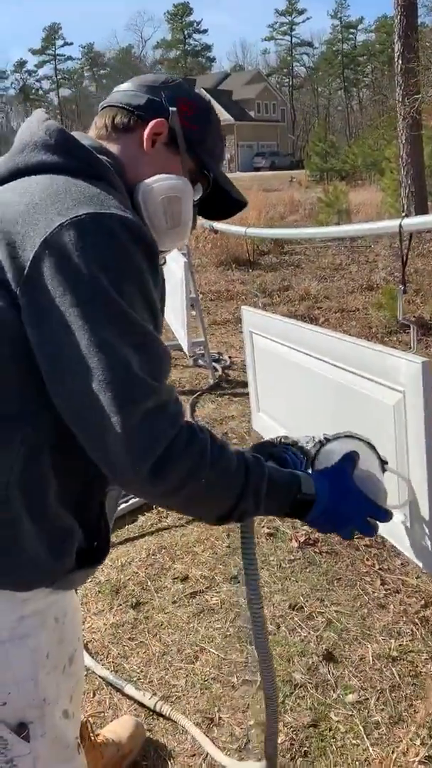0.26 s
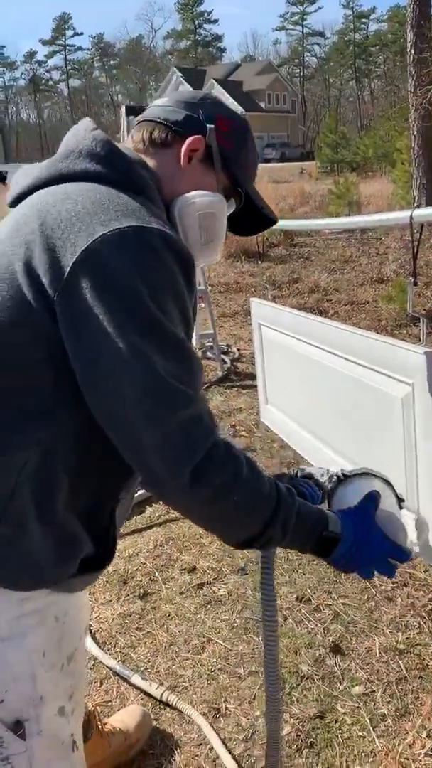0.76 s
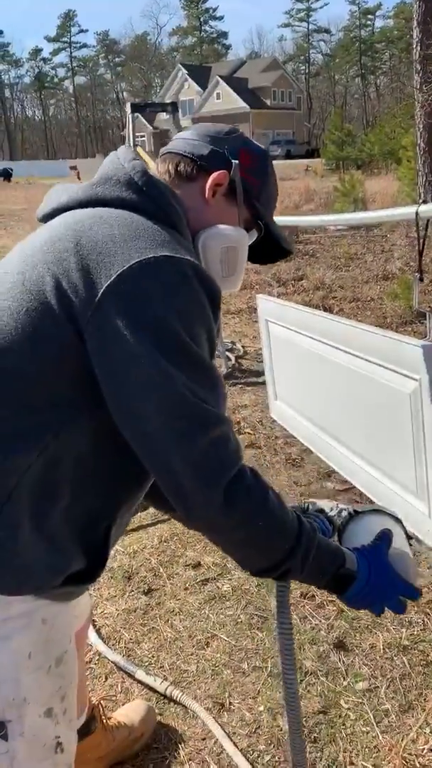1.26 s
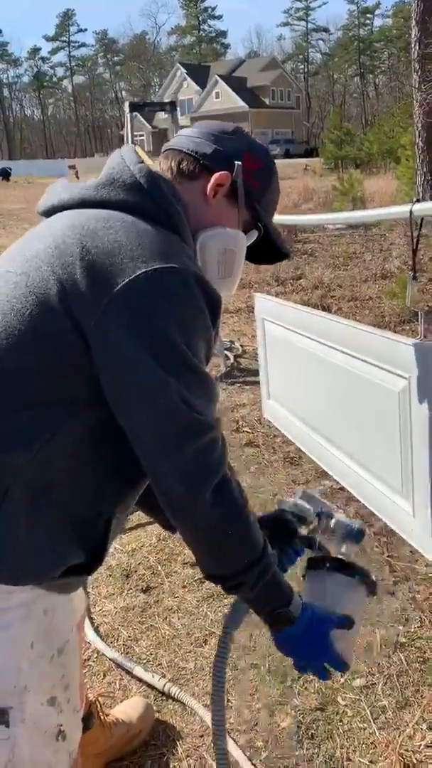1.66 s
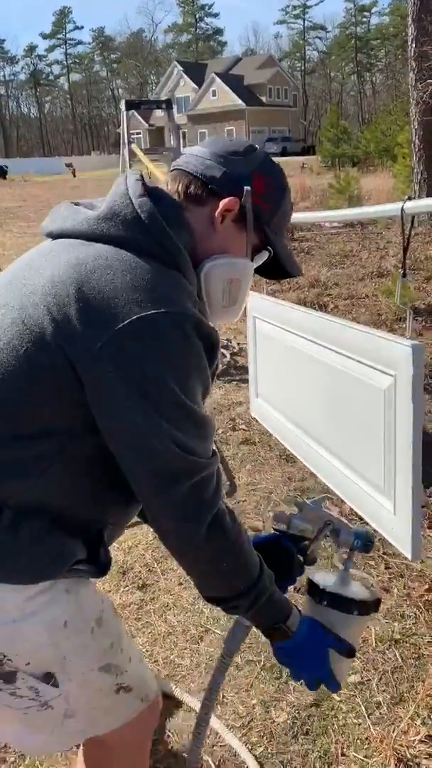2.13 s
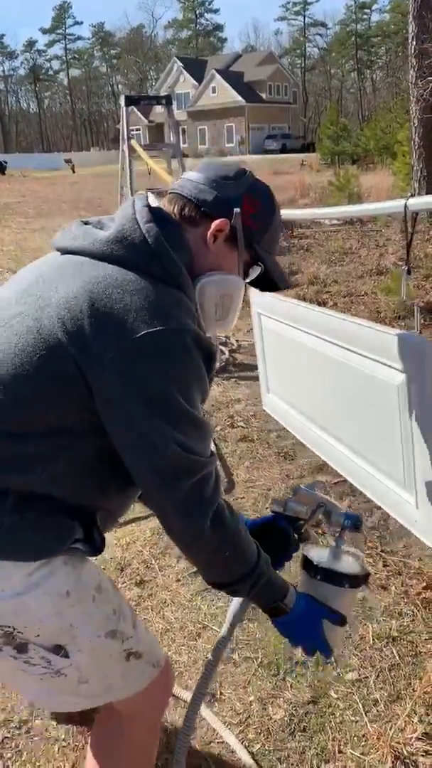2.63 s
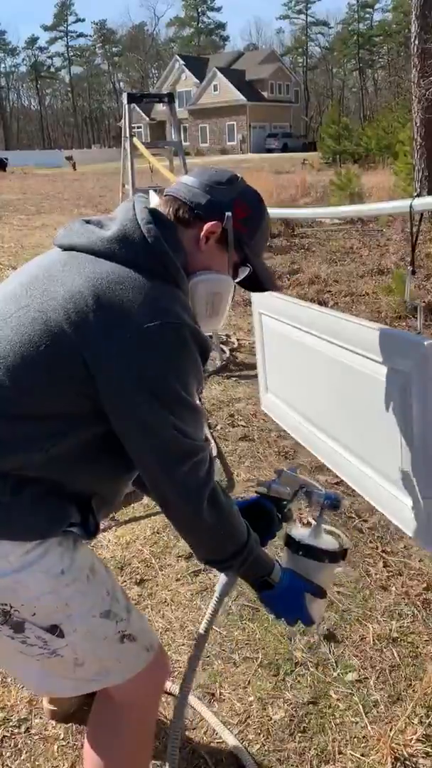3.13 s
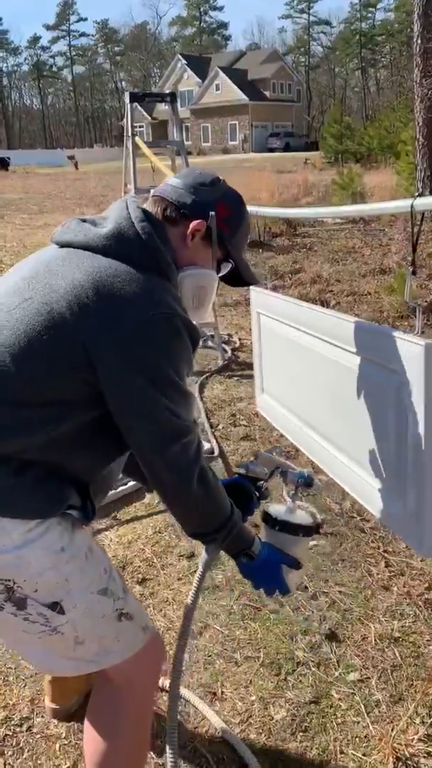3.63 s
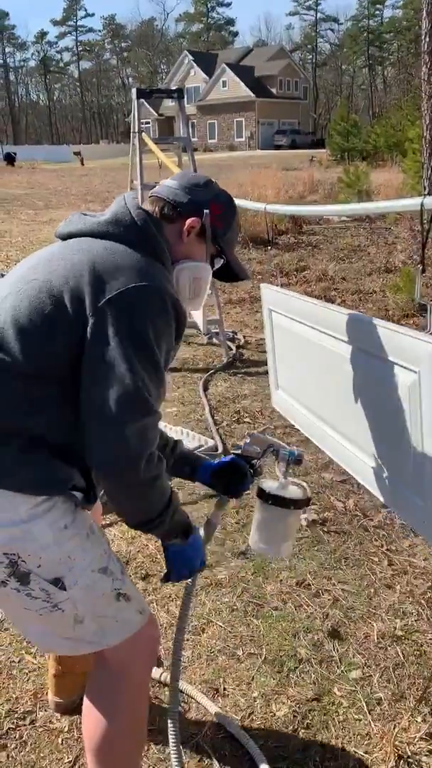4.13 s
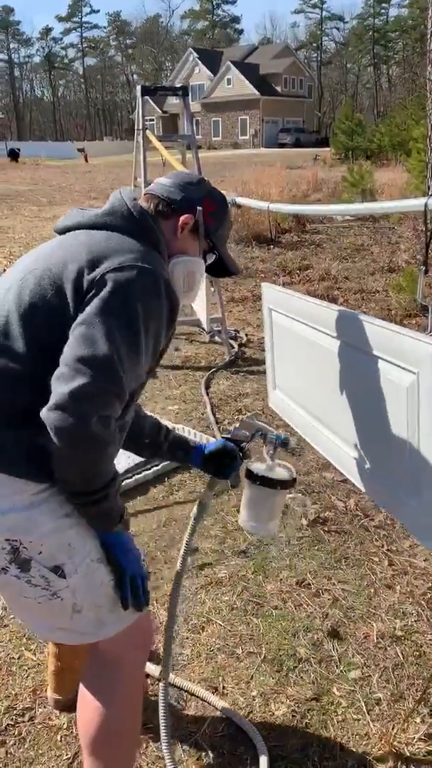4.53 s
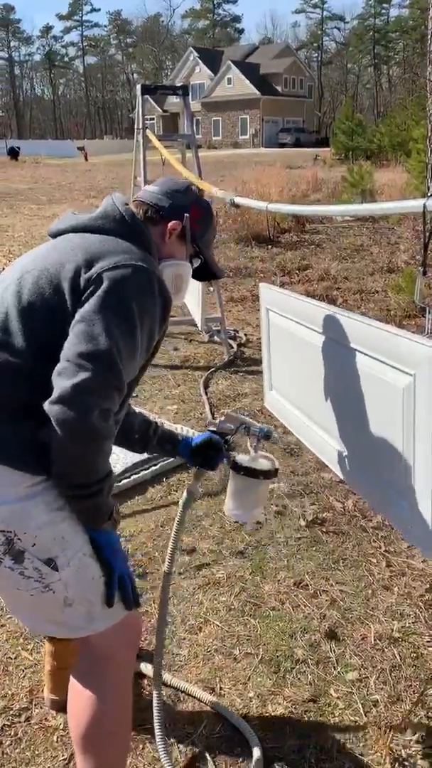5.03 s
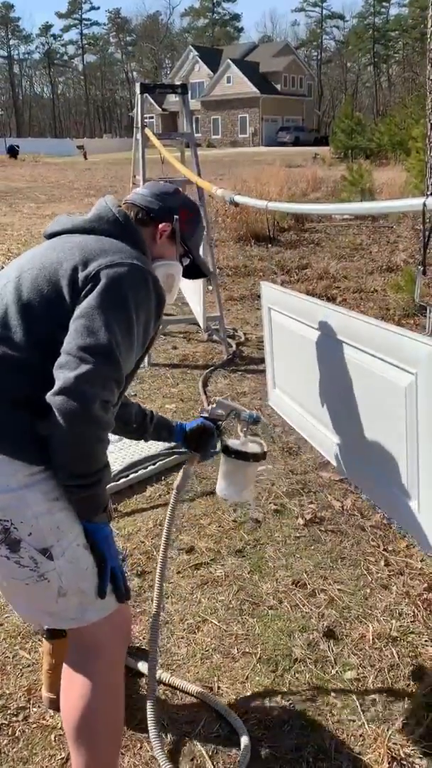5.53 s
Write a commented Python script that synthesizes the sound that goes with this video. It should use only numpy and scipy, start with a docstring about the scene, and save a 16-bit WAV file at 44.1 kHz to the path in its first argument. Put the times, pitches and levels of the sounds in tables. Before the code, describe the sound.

A hand-held stereo recorder close to a turbine paint sprayer in an open yard, with no noticeable echo. From 0 s a loud, bright, treble-heavy hiss streams from the gun near a door panel, softening by several decibels as the gun swings away. Beneath it runs a smooth whine near 350 Hz, with a rush of air, a faint motor hum and a thin singing hose. Dull whooshes pass at about 1.2 and 1.4 s. At 1.47 s the trigger is released: the hiss snaps off to a faint leak, and the whine glides up towards 370 Hz with brighter rushing air. At 2.1 s the hiss bursts back, with short clean hose notes until 2.4 s and a low whoosh. The whine slowly sinks back and is stronger from about 3 s. The hiss holds until 5.8 s, its resonances sliding gently. Soft low bumps recur, notably near 2.5 and 4.7 s.

```python
"""Turbine paint sprayer in a yard

A hand-held recorder with two microphone ports hears a spray gun's hiss, shaped noise whose colour passes from
close to a door panel, through turned sideways, to held upright. The turbine whines on one note, a sine with
faint overtones over a rush of air; its motor hums and its hose sings. The trigger is let go once: the hiss
drops to a faint leak and the blocked turbine speeds up. Low rumble, soft bumps and dull whooshes lie beneath.
"""
import sys
import numpy as np
from scipy import signal
from scipy.fft import rfft, irfft, next_fast_len
from scipy.io import wavfile
from scipy.ndimage import uniform_filter1d

SR = 44100
rng = np.random.default_rng(int(sys.argv[2]) if len(sys.argv) > 2 else 0)


def digitize_waveform(pressure):
    """Quantize a signal to 16-bit integers and store it at the path in sys.argv[1].

    Rows of a 2-D input are taken as channels; values are limited to [-1, 1].
    """
    field = np.atleast_2d(pressure).T
    bounded = np.clip(field, -1, 1)
    quanta = np.round(bounded * 32767).astype(np.int16)
    wavfile.write(sys.argv[1], SR, quanta)


N = 254898
TIME = np.arange(N) / SR
SIZE = next_fast_len(N + 4096)  # padded transform length
FREQS = np.maximum(np.fft.rfftfreq(SIZE, 1 / SR), 1)  # kept off 0 Hz for the logarithm

# All colour tables give relative level; widths of peaks span the points where their dB falls to 1/e.

# Low rumble at the recorder. Each row: frequency in Hz, level in dB per Hz.
RUMBLE_COLOUR = [(15, -52), (25, -20), (35, -3), (50, -2.5), (70, 3.5), (100, -7.5), (150, -22),
                 (260, -6.5), (500, -73)]
# Its course, before the overall trim. Each row: time in seconds, level in dB.
RUMBLE_LEVEL = [(0, -52), (2.5, -45.5), (3.5, -50.5), (4.1, -73), (4.6, -61), (4.85, -39), (5.15, -57),
                (5.45, -43), (5.65, -65)]
# Soft bumps on the recorder. Each row: start in seconds, envelope peak in dB, pitch in Hz.
BUMPS = [(0.116, -36, 52), (0.701, -34, 55), (1.229, -31.5, 88), (1.38, -36, 75), (1.651, -35, 67),
         (2.164, -36, 59), (2.405, -37, 70), (2.487, -29, 108), (2.665, -32, 65), (3.109, -42, 72.2),
         (4.355, -35, 60), (4.705, -27, 72), (4.97, -34, 60), (5.29, -39, 57), (5.41, -42, 60)]
# Dull whooshes as the gun swings, before the trim. Each row: centre in seconds, half length in seconds, level in dB.
WHOOSHES = [(1.217, 0.055, -45.5), (1.415, 0.052, -43), (2.37, 0.17, -46.5)]
# Colour of the whooshes. Each row: frequency in Hz, level in dB per Hz.
WHOOSH_COLOUR = [(110, -25), (205, -0.5), (260, -7.5), (480, -6.5), (650, -12), (1500, -25), (6000, -70)]
# Clean notes of the hose as the air starts again. Each row: centre in seconds, level in dB.
HOSE_SWELLS = [(2.155, -42.5), (2.3, -45.5), (2.385, -43)]
# Rush of the turbine and leaking air. Each row: frequency in Hz, level in dB per Hz.
RUSH_COLOUR = [(160, -3.5), (230, -4.5), (480, 0.0), (700, -6.6), (1000, -8.6), (1600, -15.4),
               (2650, -15.2), (2950, -9.3), (4300, -9.0), (4800, -14.1), (5700, -10.2), (8700, -15.2),
               (12000, -19), (15600, -25)]
# Resonances of the turbine's housing. Each row: frequency in Hz, width in Hz, height in dB.
RUSH_PEAKS = [(1200, 140, 3), (2220, 200, 3), (2650, 150, -3), (2910, 110, 4.5), (3800, 250, 2),
              (4620, 150, -4), (5500, 350, 1.5), (6850, 300, 3), (7800, 400, -2), (8780, 150, 3.5)]
# Shaft tone at the moving recorder, before the trim. Each row: time in seconds, level in dB, left minus right in dB.
TONE = [(0, -38.5, -0.4), (1.22, -37.5, -0.4), (1.44, -36, -0.8), (1.7, -44.6, 0), (1.88, -40.2, 2),
        (1.98, -35.5, 3.5), (2.2, -32, 2.5), (2.35, -35.5, 2.5), (2.51, -39.2, 1), (2.85, -38.5, -0.5),
        (3.27, -33.5, -0.7), (3.7, -32.5, -1.4), (4.35, -33, -2.5), (5.77, -35, -0.8)]
# Overtones of the shaft, before trim and speed. Each row: multiple of the shaft speed, level in dB.
OVERTONES = [(2, -54), (6, -74), (8, -70), (12, -62), (19, -67), (24, -72)]

# Colour of the jet in each pose. Each row: frequency in Hz, level in dB per Hz.
AT_DOOR = [(200, -19.3), (480, -9.4), (640, -18.0), (1300, -14.0), (2100, -11.3), (2700, -13.7),
           (3800, -15), (5200, -8.2), (6500, -9), (7300, -9), (8800, -4.3), (11000, 0.0), (13000, -0.3),
           (15600, -1.2)]
SIDEWAYS = [(200, -13.7), (480, -7.6), (640, -13.9), (1300, -12.3), (2100, -8.8), (2700, -9.8), (3800, -11),
            (5200, -1.3), (6500, -1.0), (7300, -1.0), (8800, -0.6), (11000, 0.3), (13000, -2.2),
            (15600, -5.8)]
UPRIGHT = [(200, -13.7), (480, -7.7), (640, -13.8), (1300, -8.8), (2100, -7.0), (2700, -9.8), (3800, -11.5),
           (5200, -2.5), (6500, -3), (7300, -2.0), (8800, -0.3), (11000, -0.9), (13000, -0.6),
           (15600, -7.2)]
# Reflections off cup, hand and panel in each pose. Each row: frequency in Hz, width in Hz, height in dB.
AT_DOOR_PEAKS = [(940, 350, 5.3), (3650, 300, -2), (4280, 350, 3.8), (9350, 500, 1.5), (10200, 700, -0.8)]
SIDEWAYS_PEAKS = [(950, 300, 7.3), (2130, 450, 2.8), (3050, 500, 2.2), (3900, 250, -1), (4500, 450, 4.5),
                  (5980, 300, 2.6)]
UPRIGHT_PEAKS = [(950, 300, 3.0), (2130, 400, 2.2), (3800, 300, -1.5), (4270, 300, 2.8), (6800, 350, -2.5),
                 (9900, 900, -2.1), (13900, 900, -3.5)]
# Standing waves in the air path, alike in every pose. Each row: frequency in Hz, width in Hz, height in dB.
DUCT_PEAKS = [(383, 49, -11.5), (459, 29, 2.5), (487, 22, -12), (522, 37, 2), (553, 26, -10)]
# Aim of the gun; the lows spread while the treble beams. Each row: time in seconds, jet level in dB before the trim,
# pose (0 at the door, 1 sideways, 2 upright), extra level of the lows in dB.
AIM = [(0.05, -18.5, 0.027, -1.4), (0.25, -20.5, 0, 0), (0.48, -23, 0.028, 0), (0.72, -23.5, 0.1, 0.7),
       (0.95, -26, 0.27, 3.5), (1.24, -27, 0.28, 0.5), (1.44, -30.5, 0.55, 5), (2.12, -21.5, 1, -5),
       (2.24, -22, 1, -3), (2.62, -22.5, 1.044, -1.5), (2.9, -24.5, 1.08, 0), (3.3, -23.5, 1.14, 1),
       (3.65, -23, 1.3, -1), (3.95, -24, 1.57, -0.7), (4.65, -25.5, 1.95, 0.5), (5.15, -26, 1.86, 0.5),
       (5.77, -26, 2.27, 0)]
# Resonances between gun, cup and panel, gliding as the hand moves. Each row: time in seconds, pitch in Hz, height in dB.
LOW_RESONANCE = [(0, 5400, -11), (0.65, 5300, -4), (1.3, 5630, 6), (2.2, 5500, 2), (3.1, 5600, -3),
                 (4.1, 5200, 5), (4.5, 4860, 6), (4.9, 5050, 4), (5.4, 5020, 8), (5.77, 4920, 6)]
MAIN_RESONANCE = [(0, 5800, 4.4), (0.45, 5880, 12.7), (0.85, 6170, 3.9), (1.45, 6850, 4.8),
                  (2.15, 6800, 3.8), (3.0, 6720, 4.5), (3.8, 6430, 6.3), (4.25, 6290, 7.2),
                  (4.7, 6230, 6.3), (5.77, 6240, 4.9)]
HIGH_RESONANCE = [(4.1, 8100, -2), (4.45, 8050, 3), (4.75, 8600, 3.5), (5.0, 8480, 4.5), (5.25, 8000, 4.5),
                  (5.77, 8000, 2)]
# A reflection against the direct hiss, mostly a notch. Each row: time in seconds, frequency in Hz, height in dB.
NOTCH = [(0, 7140, -8), (0.4, 7240, -3), (0.8, 7650, 0), (1.2, 7700, 6), (2.3, 7750, -2), (3.2, 7440, -1.5),
         (3.9, 7360, -5), (4.5, 7650, -5), (4.9, 7740, -1), (5.77, 7500, -10)]

# Phase by which the left port leads; near 3-5 kHz the ports oppose. Each row: frequency in Hz, lead in radians.
PORT_PHASE = [(0, 0.2), (130, -0.1), (380, 0.2), (520, 1), (640, 2.5), (730, 3.8), (950, 5.4), (1450, 6.1),
              (1900, 6.45), (2350, 7.7), (2680, 9.38), (2900, 9.425), (5550, 9.425), (5950, 10.4),
              (7000, 11.4), (7500, 12.3), (9300, 12.7), (10500, 14), (11300, 15.2), (11800, 15.7),
              (13200, 15.72), (13700, 16.3), (14200, 17.1), (15000, 18.5), (16000, 18.9)]
# Likeness of the two ports. Each row: frequency in Hz, coherence from 0 to 1.
LIKENESS = [(50, 0.9), (350, 1), (580, 0.9), (720, 0.65), (950, 0.75), (1500, 1), (1900, 1), (2350, 0.76),
            (2800, 1), (5600, 1), (6600, .88), (8400, .97), (10400, .88), (11700, 1), (13300, 1),
            (14200, .9), (15400, .97)]
# Port balance. Each row: frequency in Hz, left minus right in dB.
BALANCE = [(60, 0.8), (600, 0), (820, 6), (1150, 0), (2400, -0.3), (2800, 0), (15000, 0)]
# Phase turn between the ports, one row per pose. Each row: band centre in Hz, width in Hz, whole turns,
# left minus right in dB in that band, scatter (negative: ports more alike), extra left lead in radians.
PORT_TURNS = [(4100, 1190, 1, 5.5, 0, 0.047), (4200, 500, 0, 0, -0.5, 0.22), (4187, 1100, 1, 7, 0, 0.1)]

# Band in which the pose shifts the left port's lead.
PORT_LEAD_HZ, PORT_LEAD_WIDTH_HZ = 3150, 900
# The trigger is let go once and pulled again; the air valve moves fast, down to a small leak.
RELEASE_S, PULL_S = 1.474, 2.09
VALVE_SHUT_DB_PER_S, VALVE_OPEN_DB_PER_S, VALVE_LEAK_DB = 1200, 740, -55
# Shaft speeds in turns per second; the turbine lags behind the hose pressure and settles exponentially.
FLOWING_HZ, BLOCKED_HZ, START_HZ = 352.0, 380.6, 355.4
HOSE_LAG_S, SETTLE_S = 0.058, 0.47
# The rush grows with shaft speed and shares part of the tone's swing in level.
RUSH_DB, RUSH_DB_PER_HZ, RUSH_FOLLOWS = -44, 0.0421, 0.27
# The hose sings at a pitch in proportion to the shaft speed.
HOSE_PITCH_RATIO, HOSE_DB, HOSE_SWELL_S = 1.455, -56.5, 0.029
HUM_HZ = 120  # twice the mains frequency
CUTOFF_HZ = 15740  # top of the recorder's range


def from_db(db):
    """Decibels to gain."""
    return 10 ** (np.asarray(db) / 20)


def rms_one(x):
    """Scale to rms 1."""
    return x / np.sqrt(np.mean(x ** 2) + 1e-20)


def in_time(rows):
    """Each column of a time table, interpolated at every sample."""
    s, *columns = np.transpose(rows)
    return [np.interp(TIME, s, column) for column in columns]


def over_hz(points):
    """A table of frequency and value at every frequency, interpolated on a log axis."""
    hz, value = np.transpose(points)
    return np.interp(np.log(FREQS), np.log(hz), value)


def bell(freqs, hz, width_hz):
    """A smooth hump of height 1 around a frequency."""
    return np.exp(-(2 * (freqs - hz) / width_hz) ** 2)


def low_pass(x, hz, order):
    """The part of a sound below a frequency."""
    return irfft(rfft(x, SIZE) / (1 + (FREQS / hz) ** order), SIZE)[:, :N]


def drift(rate_hz):
    """Random motion of rms 1, mostly slower than the given rate."""
    spectrum = rfft(rng.standard_normal(SIZE))
    return rms_one(irfft(spectrum / (1 + (FREQS / rate_hz) ** 2), SIZE)[:N])


def port_phase(hz):
    """How far the left port leads the right at these frequencies, in radians."""
    return np.interp(hz, *np.transpose(PORT_PHASE))


def air_noise(spectrum, peaks=(), turn_hz=4100, turn_width_hz=900, turns=1, shadow_db=0, scatter=0, lead_rad=0,
              scatter_hz=3750, scatter_width_hz=1100):
    """Turbulent noise of a given colour at both ports, rms 1; scatter makes them less alike around one band."""
    colour_db = over_hz(spectrum)
    for hz, width_hz, peak_db in peaks:
        colour_db = colour_db + peak_db * bell(FREQS, hz, width_hz)
    # a shared part and a part of opposite sign give the ports their coherence
    direct, diffuse = rfft(rng.standard_normal((2, SIZE)))
    alike = np.clip(over_hz(LIKENESS) - scatter * bell(FREQS, scatter_hz, scatter_width_hz), 0, 1)
    sides = np.array([[1], [-1]])
    pair = np.sqrt(1 + alike) * direct + sides * np.sqrt(1 - alike) * diffuse
    # from some directions, sound bending round the recorder's body gains a full turn of phase within one band
    across = np.clip((FREQS - turn_hz) / turn_width_hz, -1, 1)
    phase = port_phase(FREQS) + round(turns) * np.pi * (1 + np.sin(np.pi / 2 * across))
    phase = phase + lead_rad * bell(FREQS, PORT_LEAD_HZ, PORT_LEAD_WIDTH_HZ)
    balance_db = over_hz(BALANCE) + shadow_db * bell(FREQS, turn_hz, turn_width_hz)
    ports = from_db(sides * balance_db / 2) * np.exp(.5j * sides * phase)
    return rms_one(irfft(pair * ports * from_db(colour_db), SIZE)[:, :N])


def valve_opening_db():
    """The air valve: fully open while the trigger is held, a leak in between."""
    shutting = VALVE_SHUT_DB_PER_S * (RELEASE_S - TIME)
    opening = VALVE_OPEN_DB_PER_S * (TIME - PULL_S)
    return np.clip(np.maximum(shutting, opening), VALVE_LEAK_DB, 0)


def shaft_speed():
    """Turns per second: the turbine spins up while the valve is shut and sinks back once air flows."""
    def settled(since_s):
        """Exponential approach from 0 to 1."""
        return 1 - np.exp(-np.maximum(TIME - since_s, 0) / SETTLE_S)
    blocked = settled(RELEASE_S + HOSE_LAG_S) - settled(PULL_S + HOSE_LAG_S)
    return START_HZ + (FLOWING_HZ - START_HZ) * settled(0) + (BLOCKED_HZ - FLOWING_HZ) * blocked


def handling(rumble_db, lumpy_db, lumpy_hz, bump_rise_s):
    """Low rumble in random lumps, and bumps that swell and die within a few cycles."""
    level_db, = in_time(RUMBLE_LEVEL)
    out = from_db(rumble_db + level_db + lumpy_db * drift(lumpy_hz)) * air_noise(RUMBLE_COLOUR)
    for start_s, peak_db, hz in BUMPS:
        age = np.maximum(TIME - start_s, 0)
        envelope = age / bump_rise_s * np.exp(1 - age / bump_rise_s)
        out = out + from_db(peak_db) * envelope * np.sin(2 * np.pi * hz * age)
    return out


def air_whooshes(level_db):
    """Dull puffs of air swell and fade as the gun is swung round."""
    swell = 0
    for centre_s, half_s, puff_db in WHOOSHES:
        swell = swell + from_db(puff_db) * np.exp(-((TIME - centre_s) / half_s) ** 2)
    return from_db(level_db) * swell * air_noise(WHOOSH_COLOUR)


def motor_hum(level_db):
    """The motor's iron hums at twice the mains frequency, its level wavering slowly."""
    return np.sqrt(2) * from_db(level_db + drift(2)) * np.sin(2 * np.pi * HUM_HZ * TIME)


def hose_whistle(width_hz):
    """Air over the hose's ribs excites a narrow, breathy tone, which locks into a clean note where it swells."""
    hz = HOSE_PITCH_RATIO * shaft_speed()
    angle = 2 * np.pi * np.cumsum(hz) / SR + np.array([[.5], [-.5]]) * port_phase(hz)
    breath = drift(width_hz) * np.sin(angle) + drift(width_hz) * np.cos(angle)
    breathy = from_db(HOSE_DB + valve_opening_db()) * breath
    swell = 0
    for centre_s, swell_db in HOSE_SWELLS:
        swell = swell + from_db(swell_db) * np.exp(-((TIME - centre_s) / HOSE_SWELL_S) ** 2)
    return breathy + np.sqrt(2) * swell * np.sin(angle)


def turbine_rush(bleed_hz, bleed_drop_db):
    """Air rushes louder at speed and where the tone carries; treble bleeding from the pressed hose fades as air flows."""
    tone_db, _ = in_time(TONE)
    level_db = RUSH_DB + RUSH_DB_PER_HZ * (shaft_speed() - FLOWING_HZ)
    level_db = level_db + RUSH_FOLLOWS * (tone_db - tone_db.mean())
    air = air_noise(RUSH_COLOUR, RUSH_PEAKS, turn_hz=4150, turn_width_hz=1500,
                    scatter=0.3, scatter_hz=3900, scatter_width_hz=4700)
    body = low_pass(air, bleed_hz, order=24)
    bleed = (air - body) * from_db(-bleed_drop_db * from_db(valve_opening_db()))
    return from_db(level_db) * (body + bleed)


def turbine(tone_db, overtone_db, strain_db_per_hz, waver_db, jitter_rad, unsteady_db):
    """Shaft unbalance gives one clean tone; brushes and vanes add faint, unsteady overtones that grow with speed."""
    speed = shaft_speed()
    mean_hz = np.mean(speed)
    level_db, pan_db = in_time(TONE)
    sides = np.array([[.5], [-.5]])
    angle = 2 * np.pi * np.cumsum(speed) / SR + jitter_rad * drift(11)
    tone_gain = from_db(tone_db + level_db + sides * pan_db + waver_db * drift(30))
    out = tone_gain * np.sin(angle + sides * port_phase(mean_hz))
    strain_db = overtone_db + strain_db_per_hz * (speed - mean_hz)
    for multiple, line_db in OVERTONES:
        k = round(multiple)
        gain = from_db(strain_db + line_db + unsteady_db * drift(13))
        out = out + gain * np.sin(k * angle + sides * port_phase(k * mean_hz))
    return np.sqrt(2) * out


def moving_colour(hiss, pose, resonance_width_hz, notch_width_hz, patchy_db, wander_rad, wander_hz, wander_width_hz):
    """Resonances and a notch glide, narrow bands flicker, and port phase wanders more away from the sideways pose."""
    freqs, times, frames = signal.stft(hiss, SR, nperseg=512, noverlap=384)

    def patches():
        """Random patches, smoothed over frequency and then time."""
        noise = rng.standard_normal(frames.shape[1:])
        across_hz = uniform_filter1d(noise, size=4, axis=0)
        return rms_one(uniform_filter1d(across_hz, size=24, axis=1))

    gain_db = patchy_db * patches()
    glides = [(LOW_RESONANCE, resonance_width_hz), (MAIN_RESONANCE, resonance_width_hz),
              (HIGH_RESONANCE, resonance_width_hz), (NOTCH, notch_width_hz)]
    for rows, width_hz in glides:
        s, hz, peak_db = np.transpose(rows)
        hump = bell(freqs[:, None], np.interp(times, s, hz), width_hz)
        gain_db = gain_db + np.interp(times, s, peak_db) * hump
    turned = np.sqrt(np.minimum(np.abs(np.interp(times, TIME, pose) - 1), 1))
    skew = wander_rad * turned * patches() * bell(freqs[:, None], wander_hz, wander_width_hz)
    frames = frames * from_db(gain_db) * np.exp(.5j * np.array([skew, -skew]))
    return signal.istft(frames, SR, nperseg=512, noverlap=384)[1][:, :N]


def spray_gun(level_db, beam_hz, slow_db, slow_hz, flutter_db, flutter_hz, fast_db, fast_hz):
    """The jet hisses through the valve, its colour passing between poses; a slight flutter unsettles its treble."""
    jet_db, pose, body_db = in_time(AIM)
    colours = [(AT_DOOR, AT_DOOR_PEAKS), (SIDEWAYS, SIDEWAYS_PEAKS), (UPRIGHT, UPRIGHT_PEAKS)]
    hiss = 0
    for k, (spectrum, peaks) in enumerate(colours):
        share = np.maximum(1 - np.abs(np.clip(pose, 0, 2) - k), 0)  # of the power
        hiss = hiss + np.sqrt(share) * air_noise(spectrum, list(peaks) + list(DUCT_PEAKS), *PORT_TURNS[k])
    hiss = moving_colour(hiss, pose, resonance_width_hz=600, notch_width_hz=340, patchy_db=1.5,
                         wander_rad=2.1, wander_hz=3640, wander_width_hz=1310)
    body = low_pass(hiss, beam_hz, order=4)
    treble = hiss - body
    # the slow and fast parts are too small to hear
    unrest_db = slow_db * drift(slow_hz) + flutter_db * drift(flutter_hz) + fast_db * drift(fast_hz)
    jet = body * from_db(body_db) + treble * from_db(unrest_db)
    return jet * from_db(level_db + jet_db + valve_opening_db())


def scene():
    """Recorder handling, swung air, turbine, hose and gun together in the open air."""
    bumps = handling(rumble_db=-3.5, lumpy_db=4.5, lumpy_hz=3.0, bump_rise_s=0.0058)
    whooshes = air_whooshes(level_db=2)
    hum = motor_hum(level_db=-55.0)
    whistle = hose_whistle(width_hz=9.4)
    rush = turbine_rush(bleed_hz=2100, bleed_drop_db=62)
    whine = turbine(tone_db=-1.0, overtone_db=-5.5, strain_db_per_hz=0.52,
                    waver_db=0.59, jitter_rad=0.082, unsteady_db=5.5)
    gun = spray_gun(level_db=0.48, beam_hz=2700, slow_db=0.02, slow_hz=5.3,
                    flutter_db=0.5, flutter_hz=15, fast_db=-0.03, fast_hz=248)
    return bumps + whooshes + hum + whistle + rush + whine + gun


def record(dry):
    """The deepest bass is rolled off and the top is cut steeply."""
    high_pass = signal.butter(2, 32, "high", fs=SR, output="sos")
    thinned = signal.sosfilt(high_pass, dry)
    return irfft(rfft(thinned, SIZE) / np.sqrt(1 + (FREQS / CUTOFF_HZ) ** 800), SIZE)[:, :N]


dry = scene()
out = record(dry)
digitize_waveform(out)
```